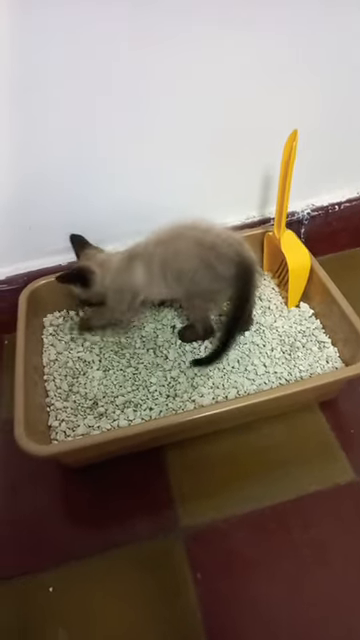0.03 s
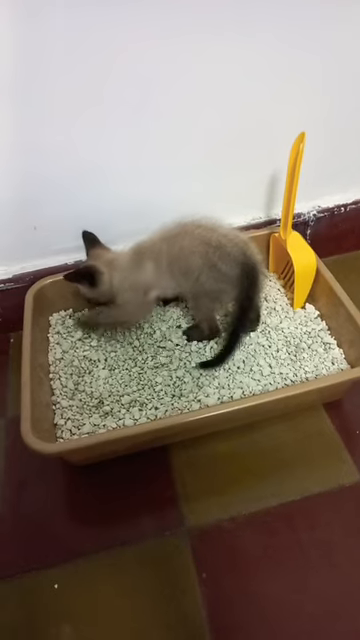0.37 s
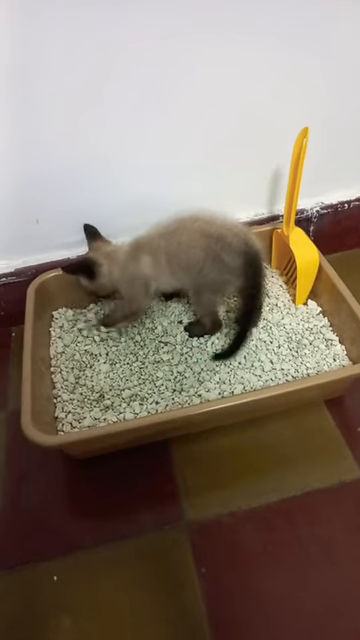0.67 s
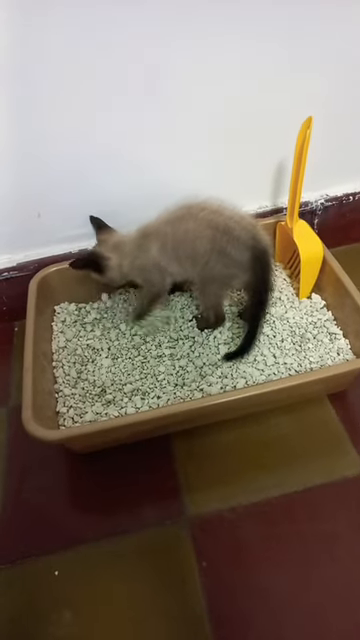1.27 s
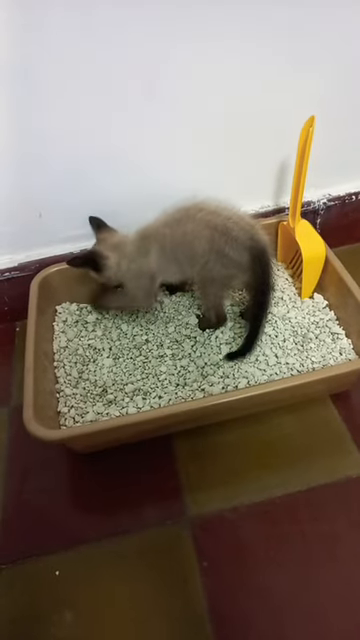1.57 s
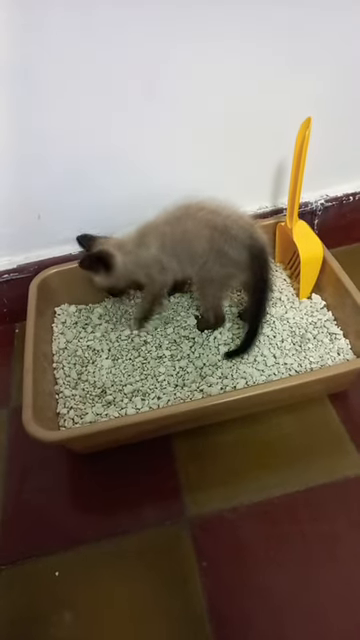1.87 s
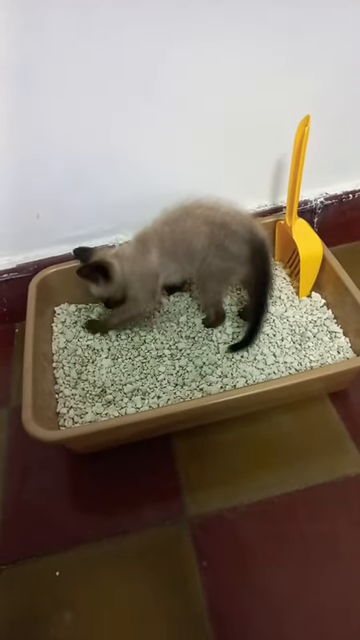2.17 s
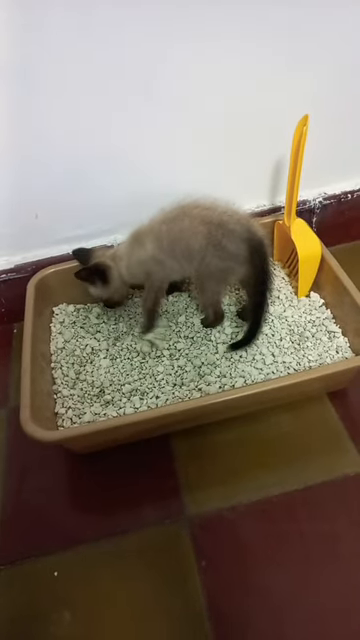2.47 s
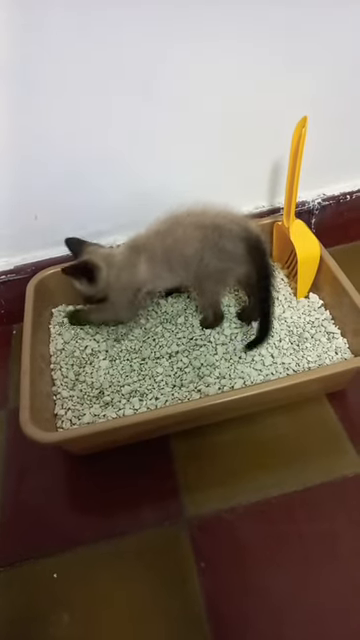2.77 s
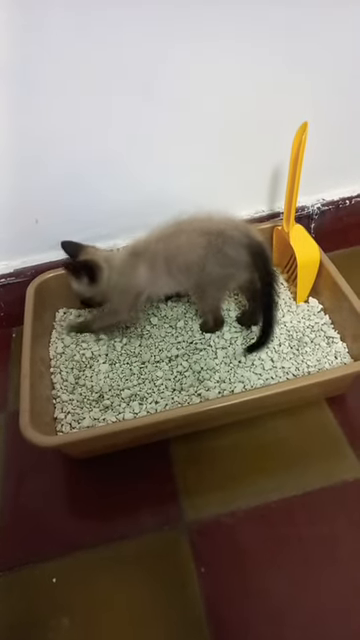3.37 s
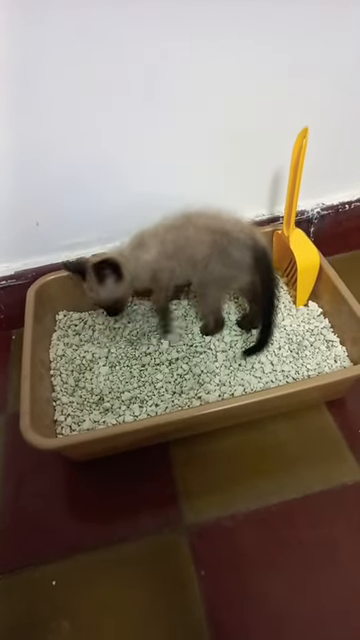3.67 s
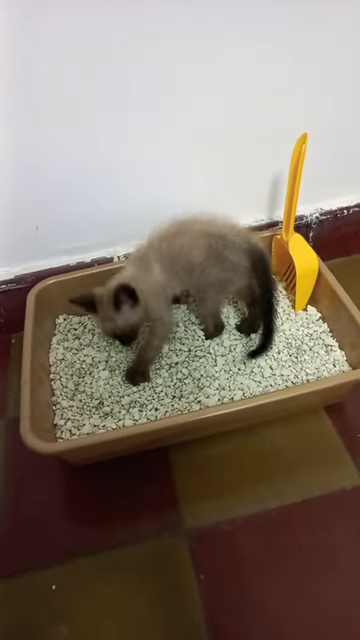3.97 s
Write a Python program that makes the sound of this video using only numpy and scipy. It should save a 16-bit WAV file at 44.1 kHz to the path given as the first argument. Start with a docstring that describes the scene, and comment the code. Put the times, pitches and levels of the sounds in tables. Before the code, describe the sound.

Scratchy scraping comes in uneven strokes as a kitten digs through litter, its claws knocking the plastic tray and loose granules ticking back. A hand-held phone nearby in a small tiled room adds soft rumble and hiss.

```python
"""A kitten rakes granular litter in a plastic tray: small tiled room, hand-held stereo phone a metre off.
In each stroke a paw lands with a hollow rub, drags granules over the ringing tray floor and ploughs
the crunching heap; loose granules trickle back with fine ticks. Underneath are dull steps and
a low uneven rumble of phone handling or tray thumps, over faint room hiss."""
import sys
import numpy as np
from scipy import signal
from scipy.fft import rfft, irfft
from scipy.io import wavfile

SR = 44100
rng = np.random.default_rng(int(sys.argv[2]) if len(sys.argv) > 2 else 0)


def to_wav(s):
    """Save 16-bit WAV."""
    ch = np.atleast_2d(s).T  # columns
    pcm = np.round(np.clip(ch, -1, 1) * 32767)  # PCM
    wavfile.write(sys.argv[1], SR, pcm.astype(np.int16))


N = 176400

# swell of the low rumble (time [s], level [dB])
RUMBLE_LEVEL = [(0.0, -60), (0.04, -85), (0.12, -54), (0.21, -63), (0.29, -50), (0.47, -58.5), (0.489, -53),
                (0.72, -61.5), (0.98, -50.5), (1.01, -64), (1.058, -51), (1.17, -48.5), (1.22, -65),
                (1.55, -53), (2.018, -63), (2.41, -52.5), (2.47, -67.5), (2.65, -47.5), (2.92, -59.5),
                (3.14, -52.5), (3.192, -63.5), (3.509, -54.5), (3.56, -63.5), (3.81, -69), (3.91, -52.5),
                (4.0, -55.5)]
# spectra of the rumble and of the room hiss (frequency [Hz], relative level [dB])
RUMBLE_COLOUR = [(20, -67), (35, -23), (55, -13.5), (75, 1), (86, -7), (102, 5), (128, -3.5), (155, -27),
                 (200, -10), (280, -20), (500, -38.5), (1500, -40), (16000, -113)]
HISS_COLOUR = [(30, 16.5), (300, 12), (600, 9.5), (1500, -17.5), (5000, -20), (9000, -21), (15000, -27)]
# decay of the tiled room (frequency [Hz], t60 [s])
ROOM_T60 = [(100, 1), (600, 0.47), (2000, 0.45), (6000, 0.33), (13000, 0.082)]
# response of the phone's two microphones (frequency [Hz], gain [dB])
LEFT_MIC = [(100, 0), (600, -5.5), (1400, -3), (3000, -1.5), (6000, -3), (8000, 4.5), (11000, -5.5),
            (14000, -5)]
RIGHT_MIC = [(100, -0.5), (600, -5.5), (1400, -1.5), (3000, 1.7), (6000, -0.5), (8000, 3), (11000, 0.5),
             (14000, 8)]

# steps, trickles and pad rubs (start [s], rise [s], hold [s], fade [dB/s], level [dB])
STEPS = [(0.04, 0.026, 0.13, 120, -57.5), (1.48, 0.0039, 0.013, 219.5, -92), (2.14, 0.13, .08, 100, -61.5),
         (2.275, 0.033, 0.067, 95, -51), (3.41, 0.021, 0.026, 124, -60.5)]
TRICKLES = [ (0.045, 0.013, 0.053, 116, -44), (0.12, 0.07, .08, 107, -50), (0.33, 0.021, 0.019, 380, -50),
            (0.565, 0.064, 0.18, 85, -48), (0.84, 0.018, 0.11, 450, -57), (1.02, 0.0056, 0.0082, 250, -70),
            (1.11, 0.1, 0.022, 137, -48.5), (1.24, 0.044, 0.11, 124, -52.5), (1.70, 0.02, 0.12, 146, -57),
            (1.88, 0.053, 0.077, 200, -53.5), (2.042, 0.0091, 0.011, 180, -52.5),
            (2.20, 0.021, 0.044, 120, -63), (2.303, 0.0054, 0.23, 172, -54.5),
            (2.571, 0.02, 0.028, 330, -50.5), (2.666, 0.0089, 0.009, 350, -46),
            (2.82, 0.053, 0.13, 132, -47.5), (3.352, .008, 0.057, 100, -68), (3.42, 0.011, 0.16, 103, -50),
            (3.69, 0.019, 0.086, 170, -58.5)]
PAD_RUBS = [(-0.01, 0.016, 0.044, 150, -40.5), (0.04, 0.036, 0.12, 131, -43),
            (0.487, 0.0017, 0.066, 103, -54.5), (1.025, 0.0019, 0.14, 92, -46.5),
            (1.619, 0.0016, 0.073, 131, -43.5), (2.30, 0.016, 0.16, 100, -72),
            (2.61, 0.016, 0.22, 150, -60.5), (3.215, 0.018, 0.065, 98.5, -67),
            (3.294, 0.013, 0.11, 113, -51)]
# raking strokes (start [s], rise [s], hold [s], fade [dB/s], tray scrape [dB], crunch [dB])
PAW_STROKES = [ (0.017, 0.041, 0.02, 96.5, -35, -41.5), (0.481, 0.0032, 0.014, 102, -47.5, -59),
               (0.547, 0.034, 0.058, 77, -40, -44.5), (1.079, 0.068, 0.045, 148, -36, -45),
               (1.225, 0.048, 0.0093, 97, -47, -54), (1.615, 0.0031, 0.085, 200, -65, -70),
               (1.696, 0.021, 0.013, 264, -38.5, -44), (1.761, 0.021, 0.037, 143, -49, -43.5),
               (2.176, 0.076, 0.077, 123, -67.5, -75), (2.286, 0.025, 0.084, 111, -62, -55.5),
               (2.43, 0.028, 0.024, 70, -78, -67), (2.67, 0.0037, 0.016, 163, -49.5, -62),
               (2.717, 0.014, 0.0088, 300, -49.5, -51.5), (2.804, 0.024, .02, 130, -44.5, -51),
               (2.818, 0.063, 0.0078, 154, -48.5, -40.5), (2.933, 0.023, 0.01, 185, -48, -46.5),
               (3.287, 0.011, 0.0053, 198.5, -57, -55.5), (3.347, 0.016, 0.021, 114, -44, -46),
               (3.381, 0.053, 0.024, 107, -48, -43.5)]
# lone granules landing, granules snapping under the paw, claws knocking the tray (time [s], level [dB])
LANDINGS = [(0.075, -19), (0.125, -20), (0.4885, -35), (0.558, -27), (0.769, -16), (0.917, -27),
            (0.969, -29), (1.089, -32), (1.827, -18), (2.048, -29), (2.064, -23), (2.158, -26),
            (2.313, -25), (2.5755, -25), (2.601, -28), (2.6195, -21), (3.303, -33), (2.889, -20),
            (3.471, -19), (3.6005, -26), (3.698, -26), (3.743, -43), (3.762, -25), (3.794, -17)]
SNAPS = [(0.177, -17.5), (0.4878, -20), (0.4999, -16), (0.558, -14.5), (0.5905, -21.5), (0.6485, -18.5),
         (1.6205, -37.5), (1.72, -24.5), (2.7425, -22), (3.302, -26.5), (3.373, -18.5), (3.44, -18)]
CLAW_KNOCKS = [(0.068, -0.5), (0.076, -5), (0.177, -3.5), (0.5903, -5.5), (0.609, -10), (0.6485, -7),
               (1.030, -21), (1.132, -12), (1.156, -9.5), (1.268, -19), (1.3285, -15), (1.620, -19),
               (1.716, -11.5), (2.742, -20), (3.36, -17.5)]
# resonances of the plastic tray (frequency [Hz], relative level [dB], t60 [s])
TRAY_MODES = [(542, -5, .14), (590, -3, .14), (636, 0, .16), (685, -6, .1), (797, -6, .18), (981, -4, .18),
              (1100, -7, .12), (1189, -6, .14), (1347, -4, .1), (1476, -4, .14), (1911, -11, .1),
              (2327, -11, .14)]
# spectrum of each kind of contact (frequency [Hz], relative level [dB])
STEP_COLOUR = [(30, -21), (60, -21), (130, -9.5), (200, 0.5), (380, -5.5), (600, -2), (1000, -35),
               (4000, -55)]
LANDING_COLOUR = [(200, -40), (3000, -41), (5800, -9.5), (8000, -29), (10000, -17), (12500, -1.5),
                  (15000, -2), (16000, -3.5)]
SNAP_COLOUR = [(100, -8), (500, -0.5), (1500, -0.5), (3000, 0), (4800, 4), (6500, -2), (8000, -14),
               (11000, -13), (16000, -26)]
TRICKLE_COLOUR = [(200, -9.5), (2500, -22.5), (4000, -14), (6300, -8.5), (8000, -20.5), (10500, -10.5),
                  (12300, -5), (14000, -7), (15300, -8)]
PAD_COLOUR = [(30, -61), (200, -29.5), (420, -21.5), (540, 3.5), (680, 5), (850, -11), (1350, -15),
              (2400, -19), (3200, -29), (7000, -36), (16000, -77)]
CRUNCH_COLOUR = [(100, -29.5), (400, 3), (900, 3.5), (2000, 4), (4000, 2), (6500, -2), (8000, -17),
                 (10000, -9), (13000, -7.5), (16000, -11)]
TRAY_COLOUR = [(30, -62), (100, -40), (200, -23.5), (400, -13), (560, 5), (850, -3.5), (1350, -3),
               (1800, -10), (2500, -13), (4000, -26.5), (7000, -48), (16000, -94)]

RISE_DB = 22  # how far a movement swells during its rise
CATCHES_PER_S, PAW_CATCH_DB = 110, 1.8  # pace and depth of catching and slipping
CLATTER, CLATTER_T60_S = .16, .012  # rattle after a tray contact, as a share of the first push
TRAY_RING_DB, TRAY_WET_DB = -3, -2.5  # ring against clack, room against direct sound
ROOM_GAP_S = 0.0018  # wait for the first reflection
LOW_CUT_HZ, HIGH_CUT_HZ = 54.4, 15600


def undb(db):
    """Decibels to gain."""
    return 10 ** (np.asarray(db) / 20)


def unit(h):
    """Scale a response to unit energy."""
    return h / np.sqrt(np.sum(h ** 2, axis=-1, keepdims=True))


def fade(t, t60):
    """Exponential decay, 60 dB down after t60."""
    return np.exp(-np.log(1000) * t / t60)


def on_log_hz(points, hz):
    """Read (Hz, value) points on a log-frequency axis."""
    freqs, values = np.array(points, float).T
    return np.interp(np.log(np.maximum(hz, 1)), np.log(freqs), values)


def response(points, size=8192):
    """Minimum-phase impulse response with the given spectrum."""
    gain = undb(on_log_hz(points, np.fft.rfftfreq(size, 1 / SR)))
    cepstrum = irfft(np.log(gain))
    cepstrum[1:size // 2] *= 2
    cepstrum[size // 2 + 1:] = 0
    return irfft(np.exp(rfft(cepstrum)))


def through(x, h):
    """Pass a sound through an impulse response."""
    return signal.fftconvolve(np.atleast_2d(x), np.atleast_2d(h), axes=-1)[:, :N]


def stereo_noise(size, width):
    """Left and right noise; width is the share of power that is unrelated."""
    noise = rng.standard_normal((3, size))
    return np.sqrt(1 - width) * noise[0] + np.sqrt(width) * noise[1:]


def envelope(rows):
    """Gain of overlapping movements that each rise, hold and fade."""
    t, power = np.arange(N) / SR, 0
    for start, rise, hold, fade_db_per_s, db in rows:
        rise_left = np.maximum(1 - (t - start) / rise, 0)
        fading_s = np.maximum(t - start - rise - hold, 0)
        power = power + undb(db - RISE_DB * rise_left ** 2 - fade_db_per_s * fading_s) ** 2
    return np.sqrt(power)


def catching(depth_db):
    """Uneven gain of a movement that catches and slips."""
    wobble_db = depth_db * rng.standard_normal(2048)
    return undb(np.interp(np.arange(N) / SR * CATCHES_PER_S, np.arange(2048), wobble_db))


def contacts(per_s, spread_db, spots):
    """Random impulses of uneven size, dealt out over several spots; total rms 1."""
    size = undb(spread_db * np.clip(rng.standard_normal(N), -2, 2)) * rng.choice([-1, 1], N)
    hits = size * (rng.random(N) < per_s / SR)
    spot = rng.integers(0, spots, N)
    return [hits * (spot == k) / np.std(hits) for k in range(spots)]


def impulse(time, db):
    """One sharp push."""
    push = np.zeros(N)
    push[int(time * SR)] = undb(db)
    return push


def room(dry, wet_db, size=32768):
    """Add the tail off the tiled walls, in which the treble dies first."""
    t, hz = np.arange(size) / SR, np.fft.rfftfreq(size, 1 / SR)
    noise, tail = rfft(stereo_noise(size, width=1)), 0
    octave = np.round(np.log2(np.maximum(hz, 125)))
    for k in np.unique(octave):
        decay = unit(fade(t, on_log_hz(ROOM_T60, 2 ** k)) * (t > ROOM_GAP_S))
        tail = tail + irfft(noise * (octave == k)) * decay
    return (dry + undb(wet_db) * through(dry, tail)) / np.hypot(1, undb(wet_db))


def scattered(sounds, wet_db, paths=4):
    """Sounds from different parts of the tray cross the room to the microphones by different paths."""
    return sum(room(sum(sounds[k::paths]), wet_db) for k in range(paths))


def rumble_and_hiss():
    """A low uneven rumble of phone handling or tray thumps, almost mono, over faint room hiss."""
    times, db = np.array(RUMBLE_LEVEL).T
    swell = undb(np.interp(np.arange(N) / SR, times, db))
    rumble = through(stereo_noise(N, width=0.025), unit(response(RUMBLE_COLOUR)))
    hiss = through(stereo_noise(N, width=0.47), unit(response(HISS_COLOUR)))
    return swell * rumble + undb(-65.5) * hiss


def steps():
    """Dull padding on the litter as the kitten shifts its weight."""
    tread = stereo_noise(N, width=0.1) * envelope(STEPS)
    return room(through(tread, unit(response(STEP_COLOUR))), wet_db=-10.5)


def granule(colour, t60_s, size=512):
    """The tiny crack of one granule, different every time."""
    crack = stereo_noise(size, width=0.8) * fade(np.arange(size) / SR, t60_s)
    return unit(through(crack, colour[:size]))


def lone_granules(events, spectrum, t60_s, wet_db):
    """Single granules that stand out at the microphones, snapping or landing."""
    colour = response(spectrum)
    cracks = sum(through(impulse(time, db), granule(colour, t60_s)) for time, db in events)
    return room(cracks, wet_db)


def trickle():
    """Loose granules roll back and land with very bright ticks."""
    flow = envelope(TRICKLES) * catching(depth_db=2.6)
    colour = response(TRICKLE_COLOUR)
    ticks = [through(flow * hits, granule(colour, t60_s=0.0013))
             for hits in contacts(per_s=1400, spread_db=6, spots=12)]
    return scattered(ticks, wet_db=0.5)


def tray_spot(colour, tilt_db_per_octave=0, size=8192):
    """The tray struck at one spot: a short plastic clack and the ring of its modes."""
    t = np.arange(size) / SR
    contact = CLATTER * stereo_noise(size, width=0.16) * fade(t, CLATTER_T60_S)
    contact[:, 0] += 1  # the first push
    clack = unit(through(contact, colour)[:, :size])
    weights = stereo_noise(len(TRAY_MODES), width=0.16).T  # each spot drives the modes differently
    ring = 0
    for weight, (hz, db, t60) in zip(weights, TRAY_MODES):
        gain = undb(db + tilt_db_per_octave * np.log2(hz / TRAY_MODES[0][0]))
        mode = unit(np.sin(2 * np.pi * hz * t) * fade(t, t60))
        ring = ring + weight[:, None] * gain * mode
    return unit(clack + undb(TRAY_RING_DB) * unit(ring))


def pad_rubs():
    """A hollow rub as the paw comes down on the tray; the higher modes ring less under a soft pad."""
    force = envelope(PAD_RUBS) * catching(PAW_CATCH_DB)
    colour = response(PAD_COLOUR)
    rubs = [through(force * hits, tray_spot(colour, tilt_db_per_octave=-6.5))
            for hits in contacts(per_s=1300, spread_db=2, spots=6)]
    return scattered(rubs, TRAY_WET_DB, paths=2)


def crunch():
    """Granules grind against each other ahead of the paw."""
    strokes = [(*shape, crunch_db) for *shape, _, crunch_db in PAW_STROKES]
    force = envelope(strokes) * catching(PAW_CATCH_DB)
    colour = response(CRUNCH_COLOUR)
    grains = [through(force * hits, granule(colour, t60_s=0.0031))
              for hits in contacts(per_s=4200, spread_db=4.5, spots=16)]
    return scattered(grains, wet_db=-3)


def tray_scrape():
    """Granules and claws judder over the plastic floor; each claw knock strikes another spot."""
    strokes = [(*shape, scrape_db) for *shape, scrape_db, _ in PAW_STROKES]
    force = envelope(strokes) * catching(PAW_CATCH_DB)
    colour = response(TRAY_COLOUR)
    judders = [force * hits for hits in contacts(per_s=1500, spread_db=1, spots=8)]
    knocks = [impulse(time, db) for time, db in CLAW_KNOCKS]
    ringing = [through(push, tray_spot(colour)) for push in judders + knocks]
    return scattered(ringing, TRAY_WET_DB, paths=3)


def scene():
    """Everything that reaches the microphone position, a metre from the tray."""
    snaps = lone_granules(SNAPS, SNAP_COLOUR, t60_s=0.0044, wet_db=-1.5)
    landings = lone_granules(LANDINGS, LANDING_COLOUR, t60_s=0.0025, wet_db=-6)
    raking = pad_rubs() + tray_scrape() + crunch()
    return raking + trickle() + snaps + landings + steps() + rumble_and_hiss()


def record(dry):
    """The right microphone hears far more top treble; the phone cuts the deep bass and the very top."""
    mics = np.array([response(LEFT_MIC), response(RIGHT_MIC)])
    low_cut = signal.butter(4, LOW_CUT_HZ, "high", fs=SR, output="sos")
    high_cut = signal.ellip(10, .2, 70, HIGH_CUT_HZ, fs=SR, output="sos")
    heard = signal.sosfilt(low_cut, through(dry, mics))
    return signal.sosfilt(high_cut, heard)


dry = scene()
out = record(dry)
to_wav(out)
```